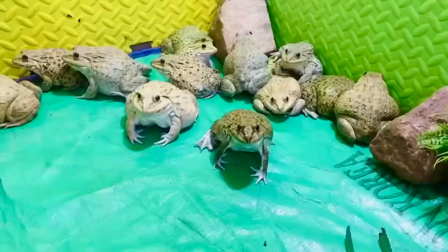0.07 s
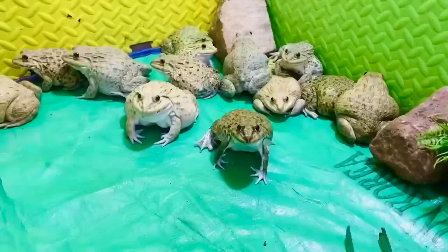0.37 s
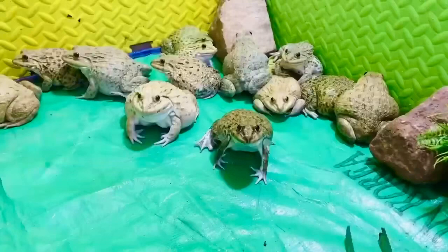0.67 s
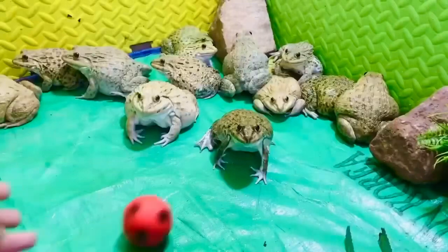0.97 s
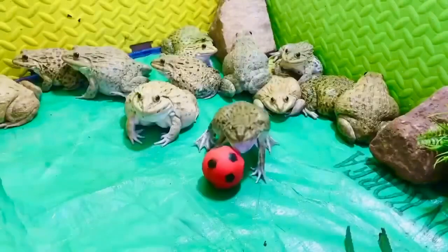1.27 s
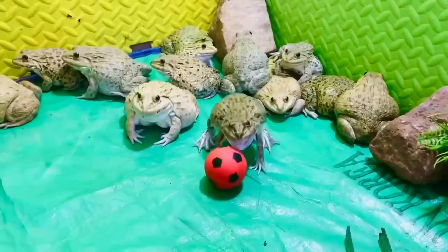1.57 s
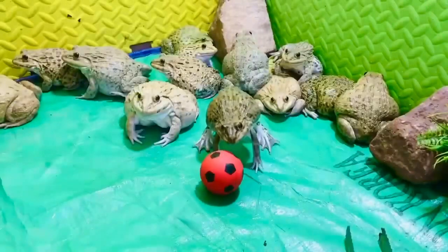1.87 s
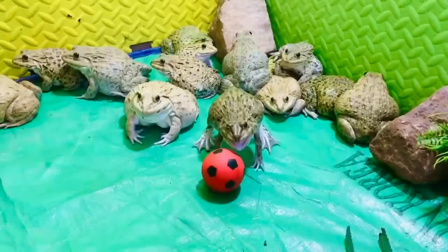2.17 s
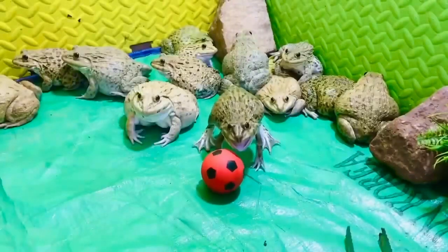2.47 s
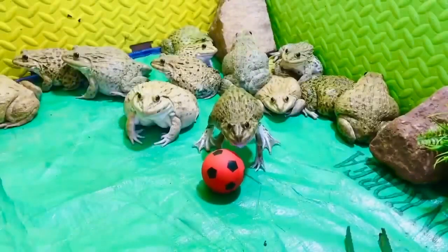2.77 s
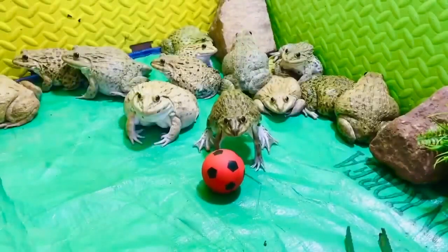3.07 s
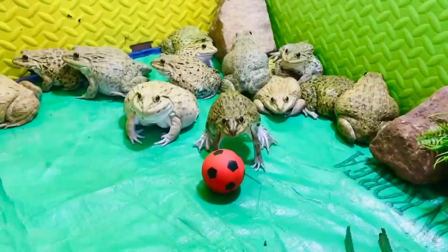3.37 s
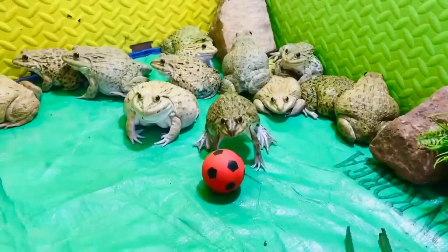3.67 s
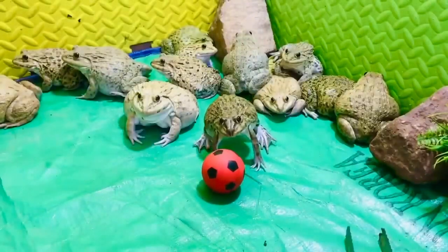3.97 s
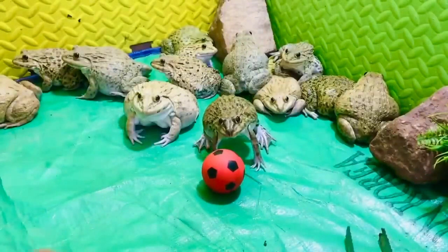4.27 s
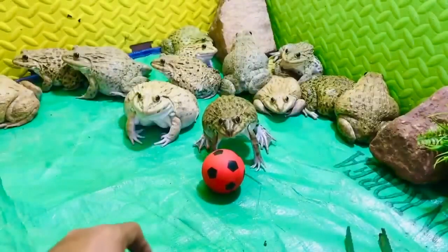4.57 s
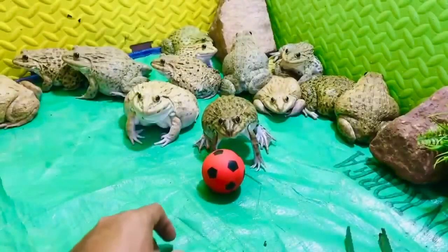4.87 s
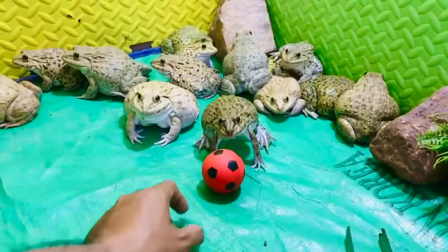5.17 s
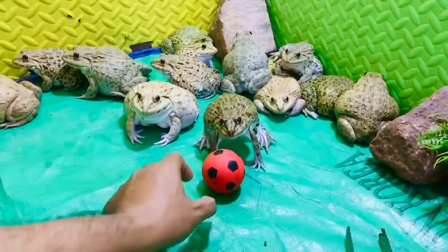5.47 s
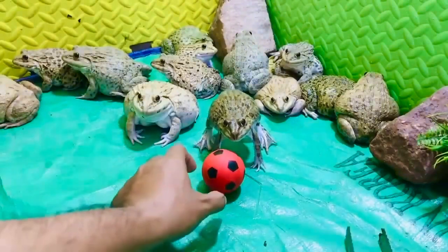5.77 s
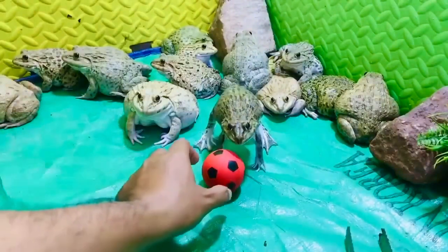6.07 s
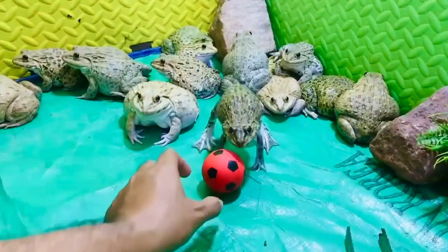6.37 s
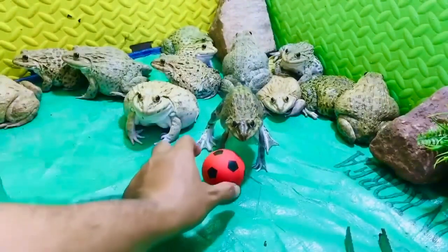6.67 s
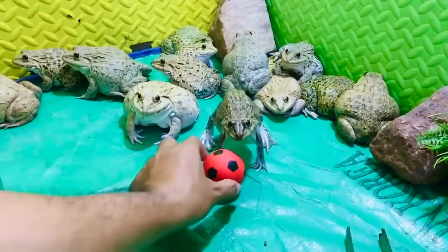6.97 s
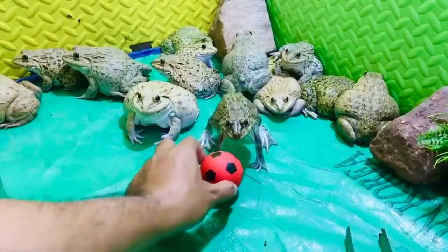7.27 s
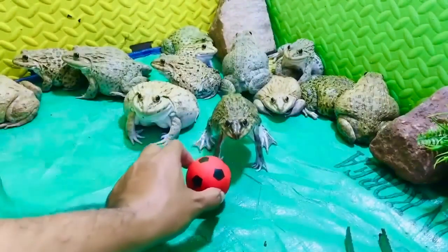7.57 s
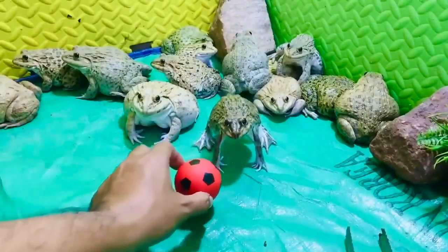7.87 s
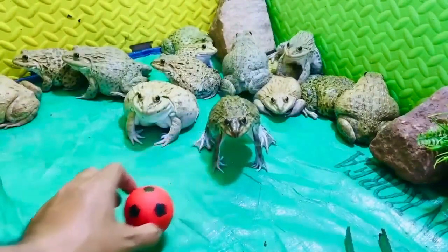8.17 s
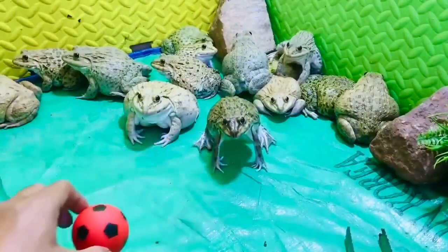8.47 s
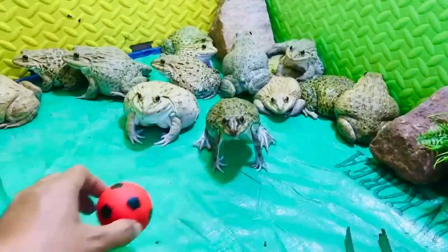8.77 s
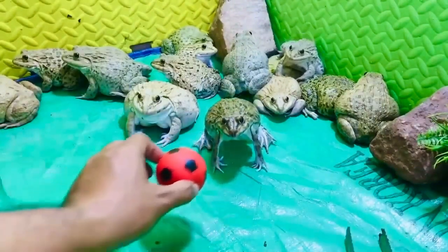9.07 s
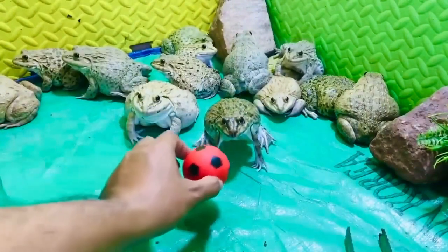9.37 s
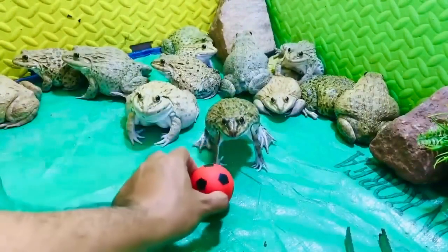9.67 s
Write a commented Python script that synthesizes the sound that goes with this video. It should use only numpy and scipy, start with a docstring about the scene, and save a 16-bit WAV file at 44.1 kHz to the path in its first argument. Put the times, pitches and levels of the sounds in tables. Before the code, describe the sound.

Three shrill, raspy frog screams ring out in a small room, then only soft fan hiss, slight plastic rustling and small taps.

```python
"""A fan hums and hisses in a small room; a toy ball scuffs over a plastic sheet up to a bullfrog.
The frog screams three times: its vocal cords snap shut in sharp pulses and ring its wide-open mouth.
Higher cries are louder; the cords rasp as they tighten, clear as they slacken and sputter when the
air runs out. Later a hand rustles over the sheet and taps the ball down. Faint squeaks, a high hiss
and a thin drone come and go over the fan."""
import sys
import numpy as np
from scipy import signal
from scipy.fft import rfft, irfft, next_fast_len
from scipy.io import wavfile
from scipy.ndimage import uniform_filter1d

SR = 44100
rng = np.random.default_rng(int(sys.argv[2]) if len(sys.argv) > 2 else 0)


def generate_wav(signal):
    """Clip the signal to [-1, 1] and save it as 16-bit WAV at the path in sys.argv[1]."""
    frames = np.transpose(np.atleast_2d(signal))
    scaled = np.clip(frames, -1, 1) * 32767
    pcm = np.round(scaled).astype(np.int16)
    wavfile.write(sys.argv[1], SR, pcm)


N = 428652
T = np.arange(N) / SR

# one breath a scream: (start [s], attack [s], time the air runs out [s], base level [dB],
# fade after that [dB/s], opening burst [dB], ragged opening [s], held roughness [0-1])
SCREAM_BREATHS = [(1.207, .009, 1.673, -20.8, 290, 5.5, .1, .33),
                  (2.106, .006, 2.37, -19.2, 150, 0.5, .045, .36),
                  (2.487, .056, 2.697, -19.3, 290, 1, .115, .3)]
# pitch of the cords, one curve a scream: (time [s], frequency [Hz])
CORD_PITCH = [
    [(1.21, 577.5), (1.224, 749.1), (1.23, 804.5), (1.244, 811.2), (1.272, 940.9), (1.354, 910.5),
     (1.388, 870.1), (1.398, 715.5), (1.416, 930.3), (1.444, 959), (1.47, 934), (1.482, 662),
     (1.514, 571.8), (1.544, 615.8), (1.56, 726), (1.582, 750.3), (1.69, 465.7)],
    [(2.11, 593), (2.124, 645), (2.142, 775.6), (2.15, 799.3), (2.208, 587.8), (2.278, 656.3), (2.354, 559),
     (2.39, 467.1)],
    [(2.52, 591.7), (2.568, 637.3), (2.592, 631.4), (2.664, 542), (2.71, 460.4)],
]
# mouth resonances, rung by the snaps: (frequency [Hz], width [Hz], relative level [dB])
MOUTH_MODES = [(2514, 250, -5.5), (3254, 260, 4), (3692, 580, 0), (4300, 470, -7), (4580, 300, -9),
               (6010, 620, -3), (6676, 700, -7.5), (8400, 420, -14.5), (9660, 1200, -3), (11150, 700, 1.5),
               (11620, 1100, -5.5), (14470, 2800, -12)]
# throat resonances, driven by the swing of the cords: (frequency [Hz], width [Hz], relative level [dB])
THROAT_MODES = [(660, 200, -1), (1340, 510, 0), (1913, 81, 0.5)]
# scuffs on the plastic sheet: (middle [s], length [s], level [dB])
SHEET_SCUFFS = [(.758, .11, -50.5), (4.305, .08, -63), (4.663, .08, -59), (4.784, 0.14, -60.5),
                (5.038, 0.42, -62), (5.202, .18, -64)]
# taps and ticks of ball, fingers and frog: (time [s], level [dB], band centre [Hz], t60 [s])
CONTACTS = [(.808, -37, 5860, 0.02), (.901, -49, 2760, 0.034), (1.178, -48, 11000, 0.019),
            (1.727, -28, 12530, 0.052), (4.635, -48.5, 7900, 0.025), (4.697, -49.5, 3270, 0.068),
            (6.212, -52, 11000, 0.026), (7.14, -59, 10000, .1), (9.5596, -38, 5800, 0.015),
            (9.567, -40, 10400, .009), (9.566, -41, 990, 0.037), (9.582, -49, 4500, .02),
            (9.653, -47, 12500, 0.017)]
# squeaks and thin whistles: (middle [s], level [dB], middle pitch [Hz], glide [Hz/s], length [s])
SQUEAK_GLIDES = [(3.071, -60, 5600, -3000, .06), (3.416, -59, 5400, -4000, 0.052),
                 (4.013, -63, 11100, 2999, .07), (5.598, -59.5, 1193, 118.5, 0.64),
                 (6.893, -59, 1197, 250, .28), (9.135, -61.5, 11210, 4000, .06)]
# motor and blade tones: (frequency [Hz], rms level [dB], pitch wander [Hz])
FAN_TONES = [(48, -59, .1), (57, -61, 1.9), (62.4, -56, 1), (91.7, -51.5, .1), (100.4, -47.5, .02),
             (137.7, -62.5, 0.58), (288, -73, .05), (325, -69, 0.35), (8454, -78.5, 60), (10920, -80, 8)]
# spectrum of the rushing air: (frequency [Hz], relative density [dB])
AIR_SPECTRUM = [(110, -17.5), (165, -11), (265, -4.5), (460, -12), (690, -7), (1150, -9.5), (2000, -17.5),
                (3200, -23), (4900, -29), (5800, -27), (7500, -33.5), (8700, -29.5), (11300, -32.5),
                (15500, -40.5)]
# reverberation of the room: (band centre [Hz], width [Hz], t60 [s], relative level [dB])
ROOM_BANDS = [(620, 430, 0.68, -1), (1502, 1500, 0.55, 2), (2760, 900, .62, 4), (4700, 2000, 0.44, -3),
              (7450, 3000, 0.59, -3.5), (11500, 5000, 0.37, -7.5)]


def frog():
    """Source and filter: the snaps of the cords ring the mouth, their smooth swing sounds the throat."""
    hz, rough, gain, throat_gain, edge_gain = breath()
    snaps, swing = cords(hz, rough)
    throat = signal.oaconvolve(swing, resonances(THROAT_MODES, cut_hz=510, skirt=1.37))[:N]
    mouth = signal.oaconvolve(snaps, resonances(MOUTH_MODES, cut_hz=1800, skirt=1.3))[:N]
    edge = colour(mouth, lambda hz: 1 / (1 + (7800 / hz) ** 16))  # the bright top of the cry
    throat, middle, edge = (steady(part, span_s=.029) for part in (throat, mouth - edge, edge))
    return gain * (middle + throat_gain * throat + edge_gain * edge)


def breath(easy_hz=610, tight_hz=725, sputter_hz=590, louder_db_per_oct=6.7, sag_db_per_s=7):
    """Cord tension and air supply govern pitch, roughness, loudness and the balance of throat and edge."""
    rows = np.array(SCREAM_BREATHS)
    current = np.maximum(np.searchsorted(rows[:, 0], T) - 1, 0)
    start, attack, spent, db, fade, burst_db, ragged, held = rows[current].T
    age, overrun = np.maximum(T - start, 0), np.maximum(T - spent, 0)
    opening = -19 * np.maximum(1 - age / attack, 0)  # dB, the swell of the attack
    burst = burst_db * np.exp(-age / .033)
    # out of air, the cords fall into a dull sputter
    sputter, dull = np.minimum(overrun / .03, 1) ** 2, np.minimum(overrun / .08, 1)
    hz = np.interp(T, *np.concatenate(CORD_PITCH).T)
    octaves = np.log2(hz / easy_hz)
    effort = muscle_lag(octaves)
    tightening = muscle_lag(np.tanh(np.gradient(octaves, T) / 1.3))
    # the cords rasp while tightening and ring clean while slackening or held taut
    rough = held + .2 * tightening - .24 * effort
    rough += (.72 - rough) * np.exp(-(age / ragged) ** 2)  # the first air is ragged
    rough = np.clip(rough + (.92 - rough) * sputter, 0, 1)
    emptying_db = sag_db_per_s * age + fade * overrun  # the cry sags as the lungs empty
    gain = (T > start) * undb(db + opening + louder_db_per_oct * effort + burst - emptying_db)
    # above the tight pitch and below the easy one, the throat falls out of tune with the cords
    detuned_db = -17 * np.log2(np.maximum(hz / tight_hz, 1)) - 20 * np.maximum(-octaves, 0)
    throat_gain = undb(-4.6 + detuned_db * (1 - dull) + 5.5 * dull)
    # the edge shines while the cords tighten and takes no part in the burst
    edge_gain = undb(3 + opening / 2 - 2.5 * effort + 1.5 * tightening - burst - 10 * dull)
    return hz + (sputter_hz - hz) * sputter, rough, gain, throat_gain, edge_gain


def muscle_lag(x, lag_s=.012):
    """First-order relaxation: muscle follows its control with a short lag."""
    keep = np.exp(-1 / (lag_s * SR))
    return signal.lfilter([1 - keep], [1, -keep], x)


def cords(hz, rough, jitter=.06, tremor=.039, drift=.05, limp=.07,
          shimmer_db=1.7, sputter_db=4.5, rasp=.48, puff_s=.0006):
    """Glottal pulses: roughness scatters their timing and strength, and turbulence follows each one."""
    phase = np.cumsum(hz * (1 + drift * rough * walk(400))) / SR
    cycle = np.arange(1, int(phase[-1]) - 2)
    closure = np.interp(cycle, phase, np.arange(N))  # in samples
    cycle_rough, cycle_hz = rough[closure.astype(int)], hz[closure.astype(int)]
    timing_draw, strength_draw = rng.standard_normal((len(cycle), 2)).T
    # period doubling: stretched to their highest, the cords alternate long and short cycles
    alternation = (-1) ** cycle * cycle_rough * np.clip((cycle_hz - 700) / 200, 0, 1)
    timing_spread = tremor * cycle_rough + jitter * cycle_rough ** 2
    closure += SR / cycle_hz * (timing_spread * timing_draw + limp * alternation)
    spread_db = shimmer_db * cycle_rough + sputter_db * cycle_rough ** 10
    strength = undb(spread_db * strength_draw + 3.5 * alternation)
    # each snap is a band-limited impulse that can fall between samples
    samples = closure.astype(int)[:, None] + np.arange(-7, 9)
    offset = samples - closure[:, None]
    impulse = np.sinc(offset) * np.cos(np.pi * offset / 16) ** 2
    snaps = np.bincount(np.clip(samples, 0, N - 1).ravel(), (strength[:, None] * impulse).ravel(), N)
    puffs = unit(signal.lfilter([1], [1, -np.exp(-1 / (puff_s * SR))], snaps))
    air = puffs * rng.standard_normal(N)
    angle = 2 * np.pi * np.interp(np.arange(N), np.sort(closure), cycle)
    swing = np.sin(angle) + undb(-2) * np.sin(2 * angle) + undb(-12) * np.sin(3 * angle)
    swing *= 1 - .48 * rough ** 2
    return unit(snaps) + rasp * (rough + .27) * air, swing + 2.1 * (rough + .15) * air


def resonances(modes, cut_hz, skirt, size=2048):
    """Cavity resonance: the minimum-phase impulse response of a set of modes above a steep low cut."""
    hz = np.arange(size // 2 + 1) * SR / size + 1
    power = sum(undb(db) ** 2 / (1 + (2 * (hz - f) / width) ** 2) ** skirt for f, width, db in modes)
    power = power / (1 + (cut_hz / hz) ** 12) + 1e-7
    cepstrum = irfft(np.log(power) / 2)
    cepstrum[1:size // 2] *= 2  # folding the cepstrum makes the response causal
    cepstrum[size // 2 + 1:] = 0
    return irfft(np.exp(rfft(cepstrum)))


def scuffs(slips_per_s=700, crinkles_per_s=70):
    """Friction: dense tiny slips on the plastic sheet make noise that bunches into crinkles."""
    slips = rng.standard_normal(N) * undb(3.5 * walk(slips_per_s) + 1.6 * walk(crinkles_per_s))
    rustle = unit(band(slips, 1900, 12500, order=1))
    return rustle * sum(undb(db) * arch(s, length) for s, length, db in SHEET_SCUFFS)


def taps():
    """Damped impacts: each light contact on plastic is a band of noise that decays exponentially."""
    out = np.zeros(N)
    for s, db, hz, t60 in CONTACTS:
        start = int(s * SR)
        t = T[:min(SR // 10, N - start)]
        tick = unit(band(rng.standard_normal(len(t)), hz / 1.5, hz * 1.5))
        out[start:start + len(t)] += undb(db) * tick * decay(t, t60)
    return out


def squeaks(waver=.018):
    """Frequency modulation: faint, far-off tones glide and waver."""
    out = np.zeros(N)
    for s, db, hz, glide, length in SQUEAK_GLIDES:
        t = np.clip(T - s, -length / 2, length / 2)
        pitch = hz + glide * t + waver * hz * walk(600)
        out += undb(db) * arch(s, length) * sine(pitch)
    return out


def hiss():
    """Amplitude modulation: a high band of noise swells once and fades."""
    return unit(band(rng.standard_normal(N), 9100, 11000)) * undb(-64.5) * arch(5.92, 1.05)


def fan(air_db=-52, sink_db_per_s=.19):
    """Beating: motor hum and blade tone interfere, over a low rumble and a slowly sinking rush of air."""
    tones = sum(np.sqrt(2) * undb(db) * sine(hz + wander * walk(12), rng.random())
                for hz, db, wander in FAN_TONES)
    points_hz, density_db = np.transpose(AIR_SPECTRUM)
    air = colour(rng.standard_normal(N),
                 lambda hz: undb(np.interp(np.log(hz), np.log(points_hz), density_db)))
    air /= np.std(band(air, 400, 3000))  # air_db is the level of this middle band
    air *= undb(air_db - sink_db_per_s * T + .17 * walk(6))
    rumble = unit(band(rng.standard_normal(N), 45, 100, order=3)) * undb(-56.5 + 2.2 * walk(2))
    return tones + air + rumble


def drone(hz=376, peak_db=-56.5, peak_s=7.9, slope_db_per_s=2.5):
    """Exponential growth and decay: a thin tone swells to one peak and fades."""
    return undb(peak_db - slope_db_per_s * np.abs(T - peak_s)) * sine(hz + .8 * walk(7.8))


def room(x, early_db, early_t60, tail_db):
    """Reverberation: quick reflections from floor and corner walls, then a diffuse tail."""
    t = T[:SR]
    early = rng.standard_normal(SR) * (rng.random(SR) < .03) * (t > .001) * decay(t, early_t60)
    tail = np.zeros(SR)
    for hz, width, t60, db in ROOM_BANDS:
        noise = band(rng.standard_normal(SR), max(hz - width / 2, 100), hz + width / 2)
        tail += undb(db) * noise * decay(t, t60)
    tail *= 1 - np.exp(-t / .0093)  # the diffuse field builds up
    response = undb(early_db) * early / np.linalg.norm(early) + undb(tail_db) * tail / np.linalg.norm(tail)
    return x + signal.fftconvolve(x, response)[:N]


def undb(db):
    """Decibels to amplitude ratio."""
    return 10 ** (np.asarray(db) / 20)


def unit(x):
    """Normalisation to rms 1."""
    return x / np.sqrt(np.mean(x ** 2))


def steady(x, span_s):
    """Gain control: holds the running rms near 1."""
    power = np.maximum(uniform_filter1d(x ** 2, int(span_s * SR)), 0)
    return x / np.sqrt(power + np.mean(x ** 2) / 1000)


def sine(hz, start_cycles=0):
    """Oscillation whose phase is the integral of frequency."""
    return np.sin(2 * np.pi * (np.cumsum(hz) / SR + start_cycles))


def decay(t, t60):
    """Exponential damping by 60 dB in t60 seconds."""
    return np.exp(-np.log(1000) * t / t60)


def arch(middle_s, length_s):
    """Half-cosine envelope: a rise and fall around a moment."""
    return np.cos(np.pi * np.clip((T - middle_s) / length_s, -.5, .5))


def walk(per_s):
    """Random modulation: per_s levels a second joined by ramps, at rms 1."""
    hold = int(SR / per_s)
    return unit(uniform_filter1d(np.repeat(rng.standard_normal(N // hold + 1), hold), hold)[:N])


def band(x, lo_hz, hi_hz, order=2):
    """Maximally flat band-pass filtering."""
    sos = signal.butter(order, [lo_hz, min(hi_hz, SR / 2 - 500)], "band", fs=SR, output="sos")
    return signal.sosfilt(sos, x)


def colour(x, gain_at):
    """Spectral shaping by a gain that is a function of frequency."""
    size = next_fast_len(N + 8192)
    hz = np.maximum(np.arange(size // 2 + 1) * SR / size, 1)
    return irfft(rfft(x, size) * gain_at(hz), size)[:N]


def scene():
    """Superposition: all sources add in the middle; the taps are nearer and so sound drier."""
    far = room(frog() + scuffs() + squeaks() + hiss(), early_db=-6.5, early_t60=.052, tail_db=-14.5)
    near = room(taps(), early_db=-9, early_t60=.03, tail_db=-16)
    mono = far + near + fan() + drone()
    return np.array([mono, mono])


def record(dry, ceiling=.95, top_hz=15700):
    """Saturation and band limiting: after a quick fade-in, peaks are rounded and the top is cut."""
    sound = dry * np.clip((T - .07) / .06, 0, 1) ** 2
    rounded = sound / (1 + (sound / ceiling) ** 4) ** .25
    return signal.sosfiltfilt(signal.ellip(10, .1, 50, top_hz, fs=SR, output="sos"), rounded)


dry = scene()
out = record(dry)
generate_wav(out)
```